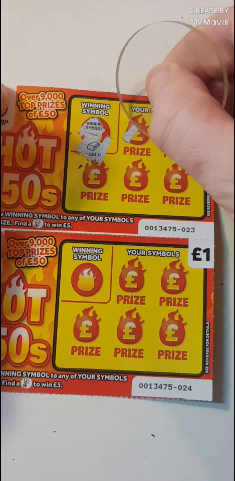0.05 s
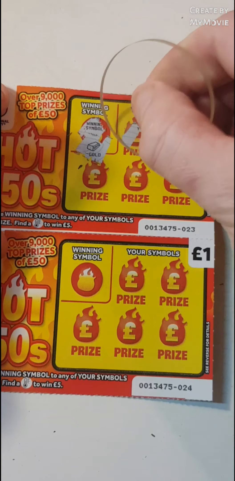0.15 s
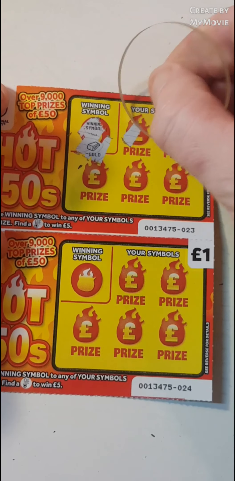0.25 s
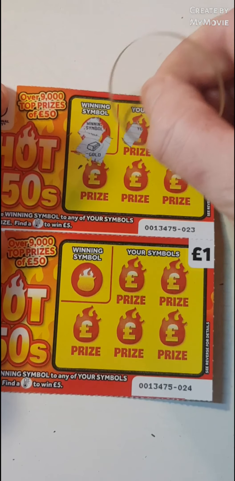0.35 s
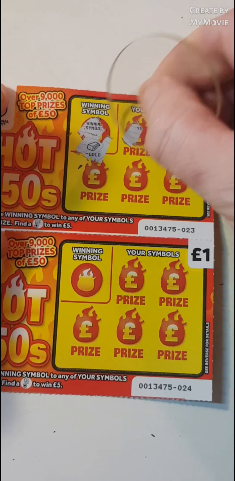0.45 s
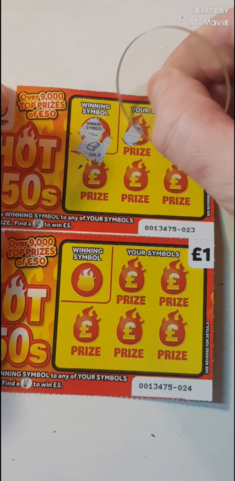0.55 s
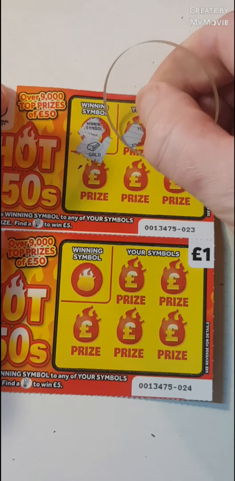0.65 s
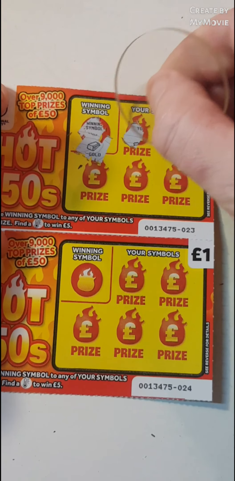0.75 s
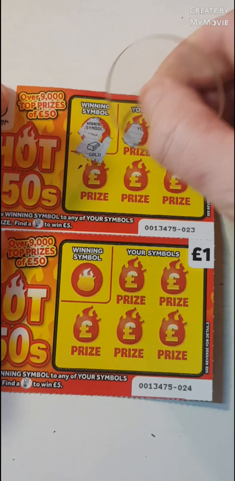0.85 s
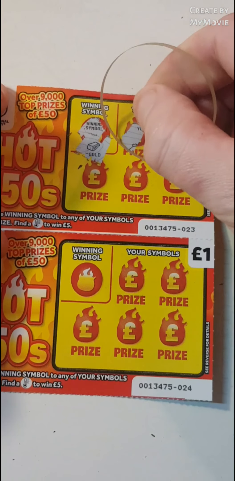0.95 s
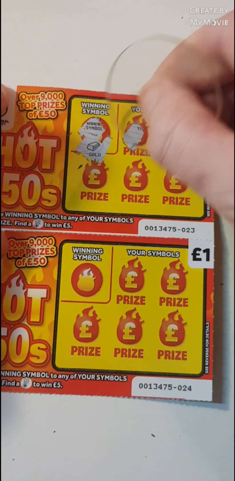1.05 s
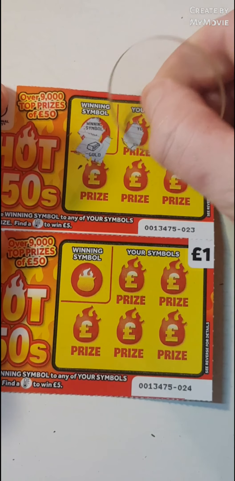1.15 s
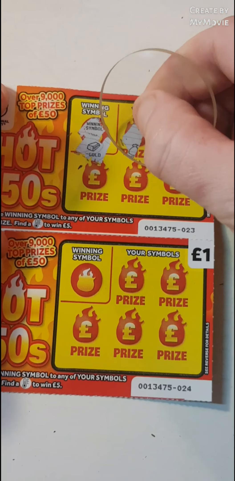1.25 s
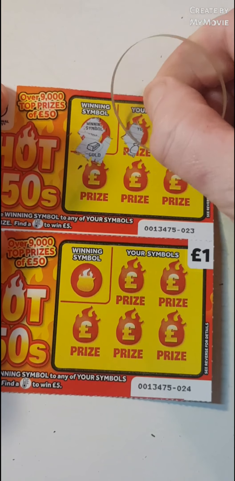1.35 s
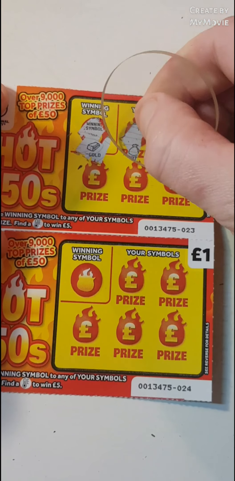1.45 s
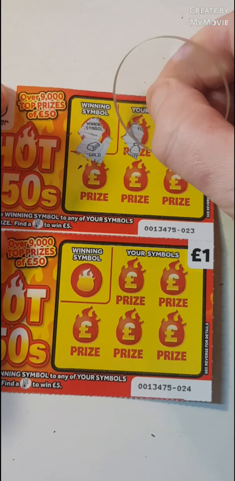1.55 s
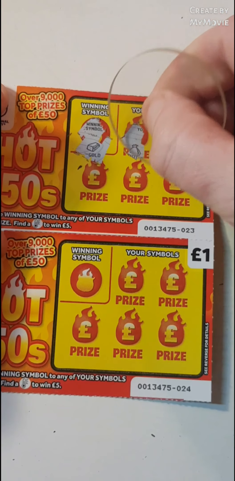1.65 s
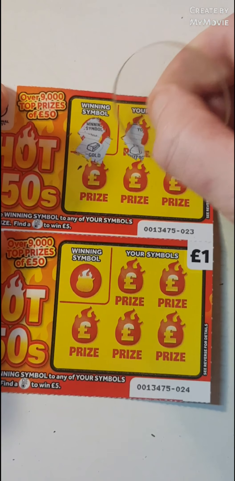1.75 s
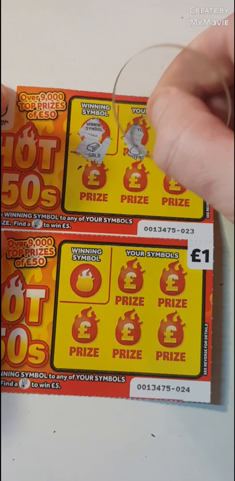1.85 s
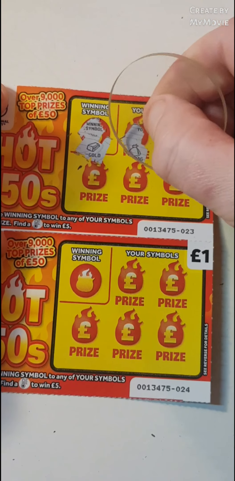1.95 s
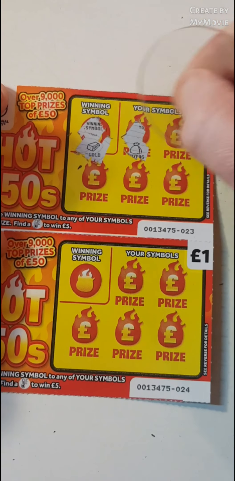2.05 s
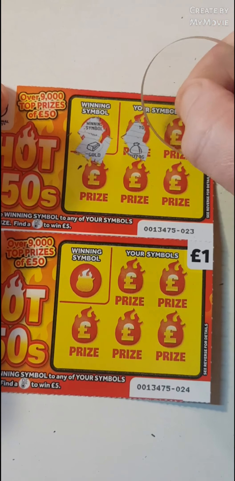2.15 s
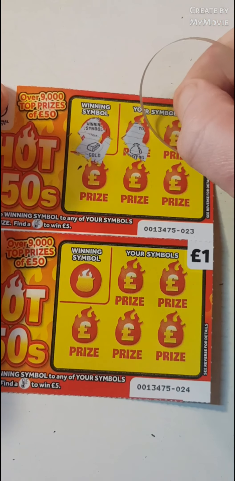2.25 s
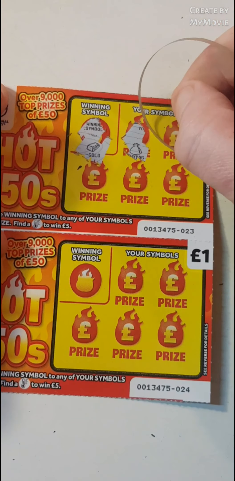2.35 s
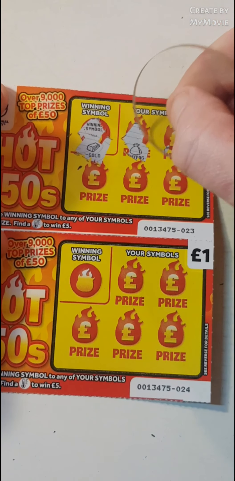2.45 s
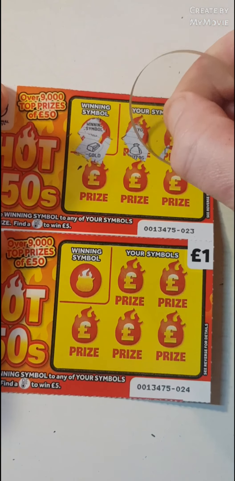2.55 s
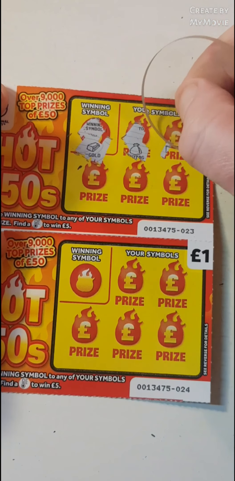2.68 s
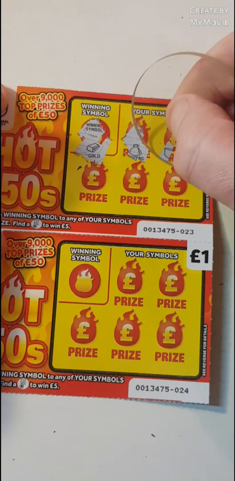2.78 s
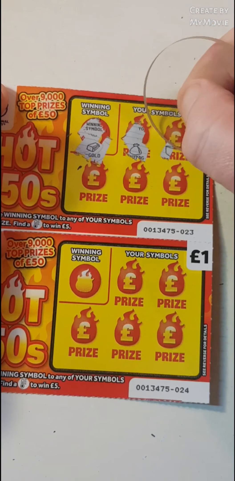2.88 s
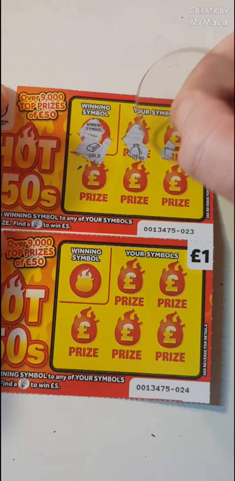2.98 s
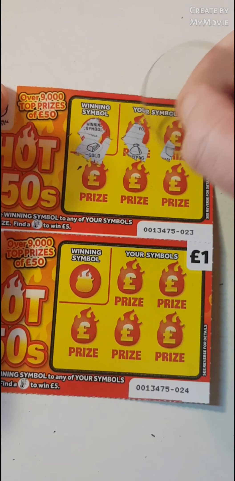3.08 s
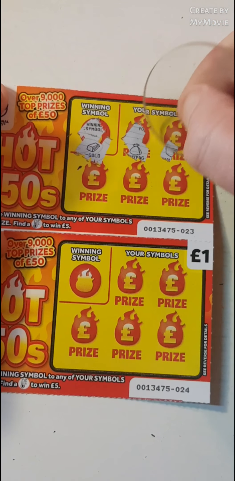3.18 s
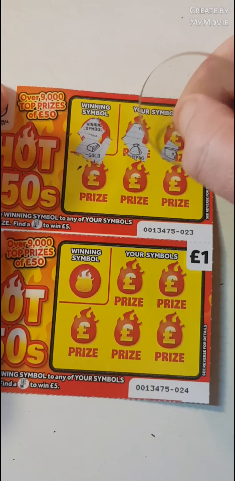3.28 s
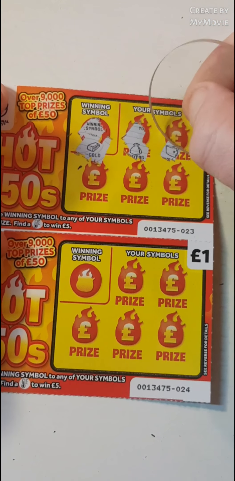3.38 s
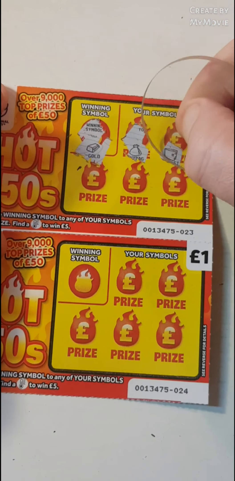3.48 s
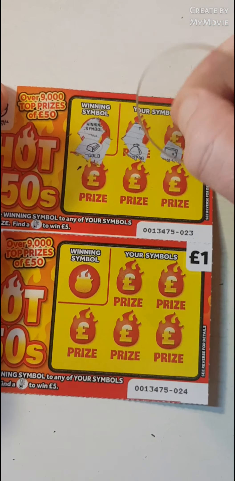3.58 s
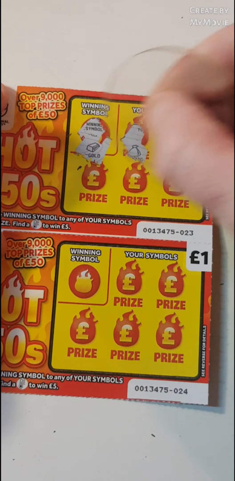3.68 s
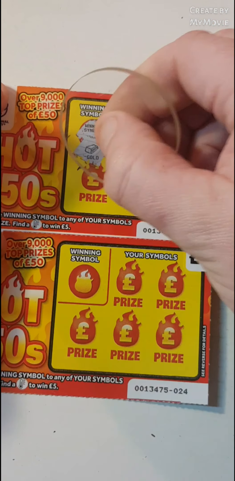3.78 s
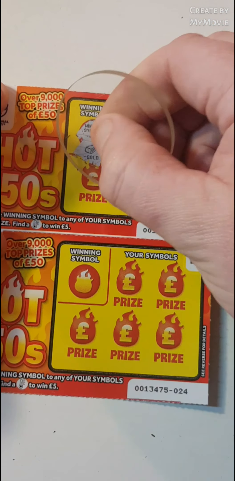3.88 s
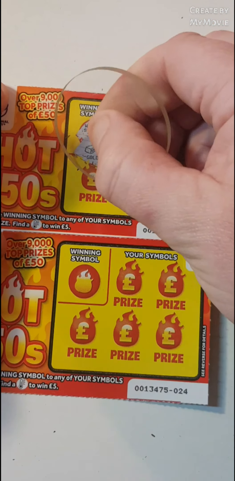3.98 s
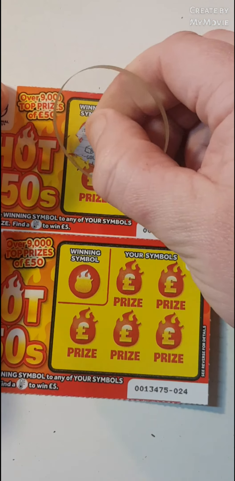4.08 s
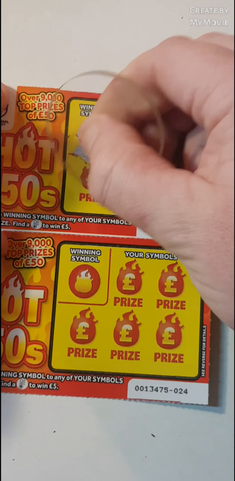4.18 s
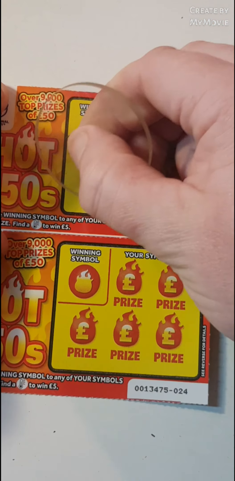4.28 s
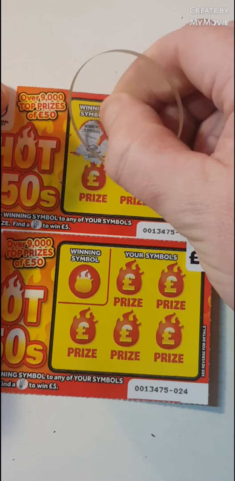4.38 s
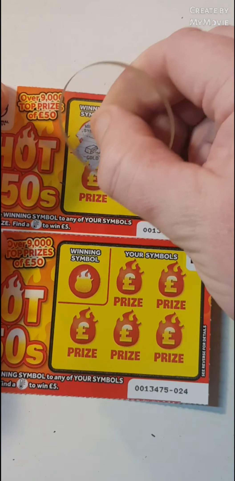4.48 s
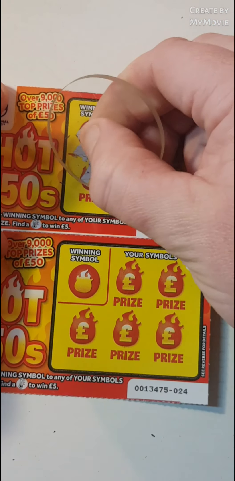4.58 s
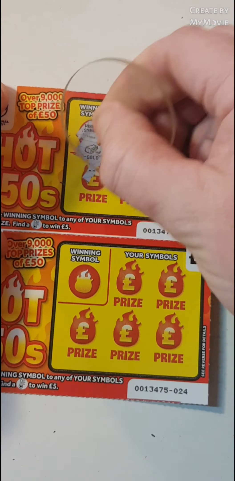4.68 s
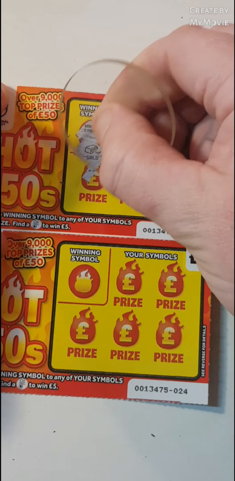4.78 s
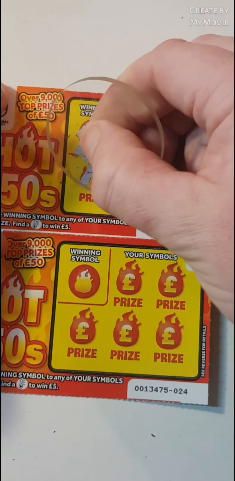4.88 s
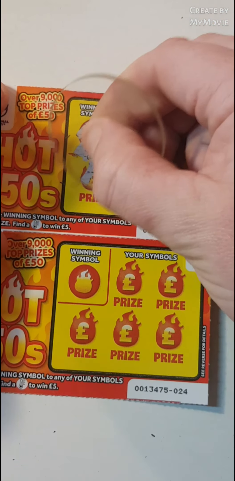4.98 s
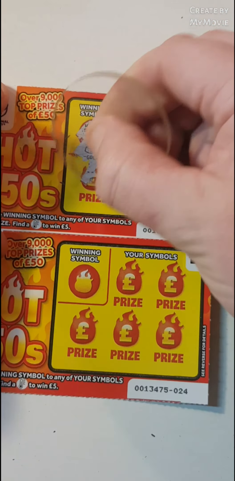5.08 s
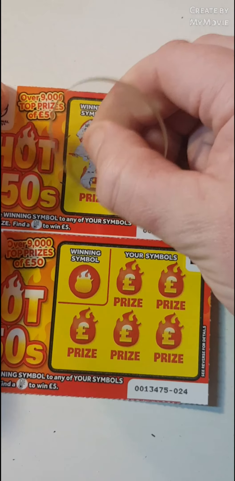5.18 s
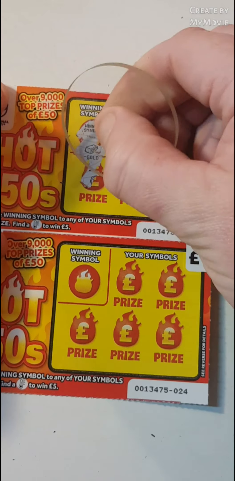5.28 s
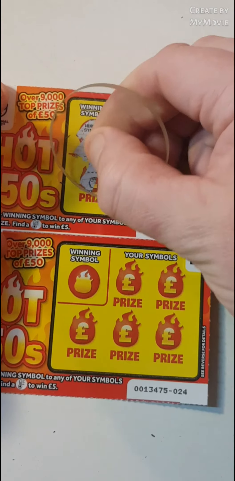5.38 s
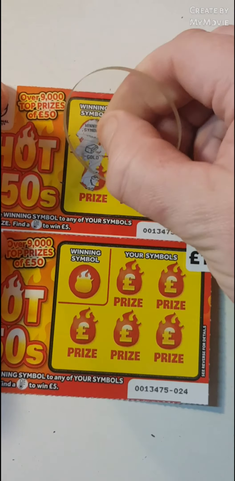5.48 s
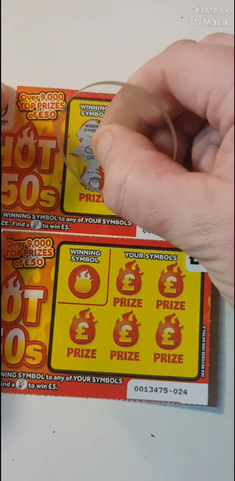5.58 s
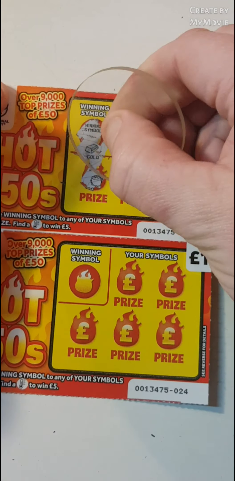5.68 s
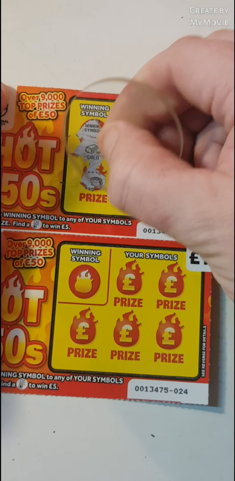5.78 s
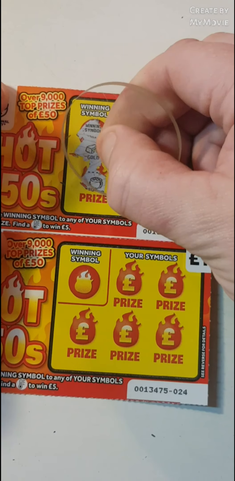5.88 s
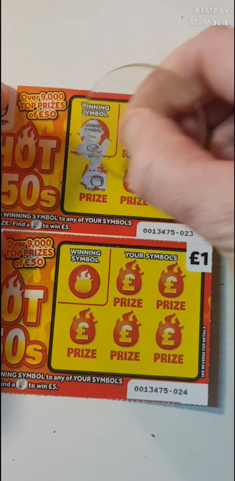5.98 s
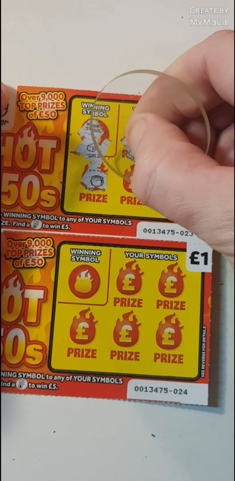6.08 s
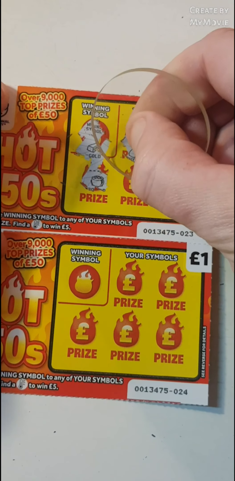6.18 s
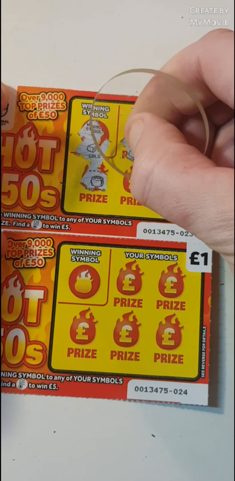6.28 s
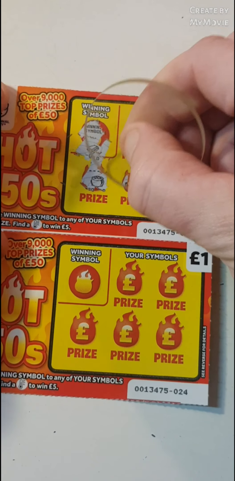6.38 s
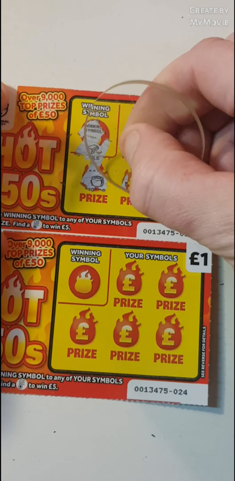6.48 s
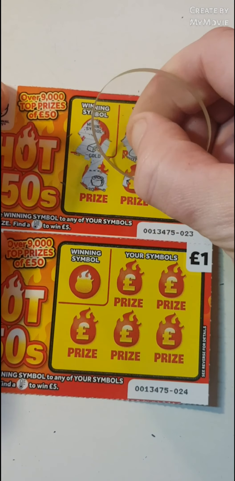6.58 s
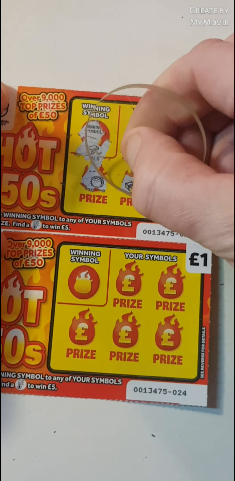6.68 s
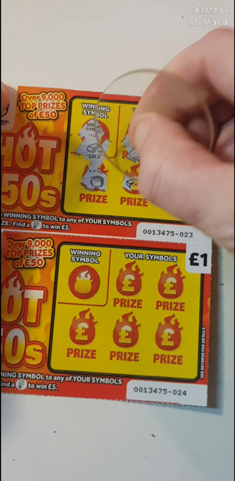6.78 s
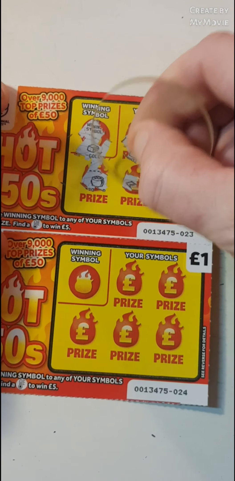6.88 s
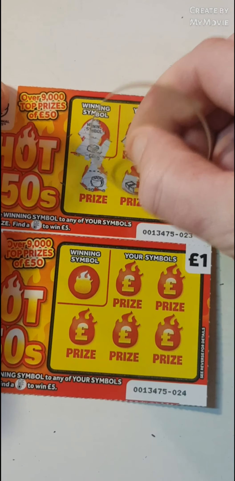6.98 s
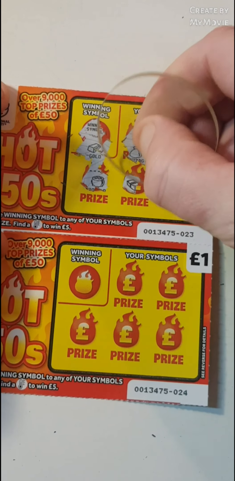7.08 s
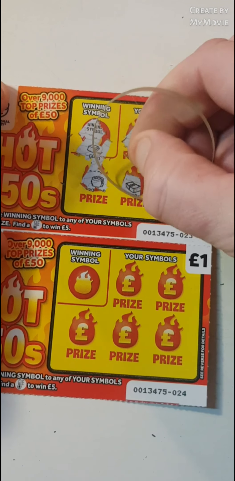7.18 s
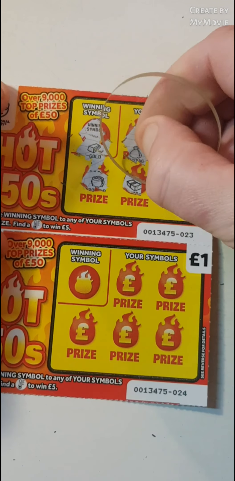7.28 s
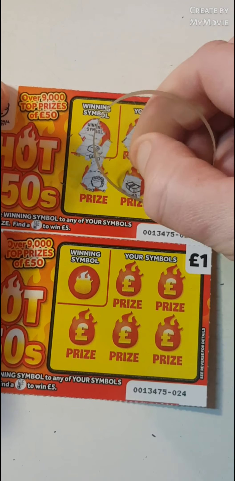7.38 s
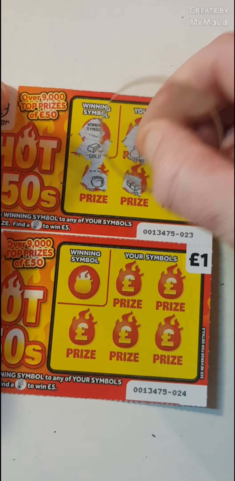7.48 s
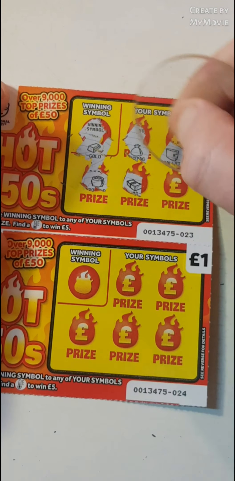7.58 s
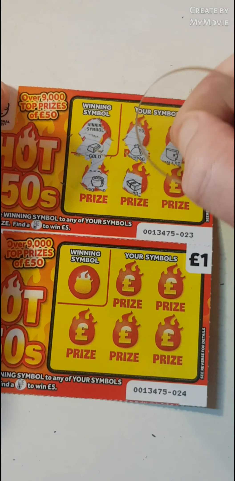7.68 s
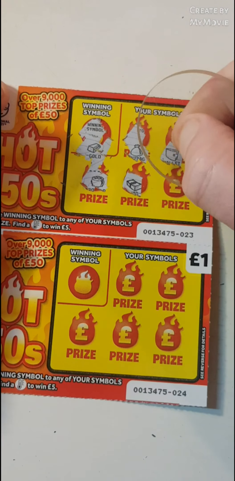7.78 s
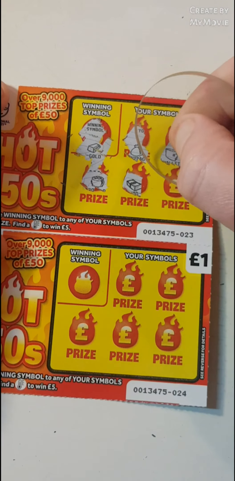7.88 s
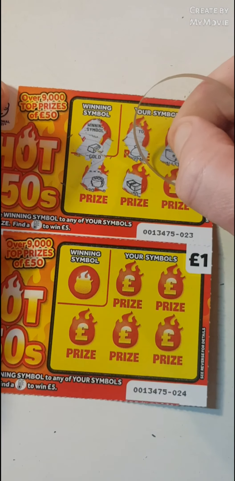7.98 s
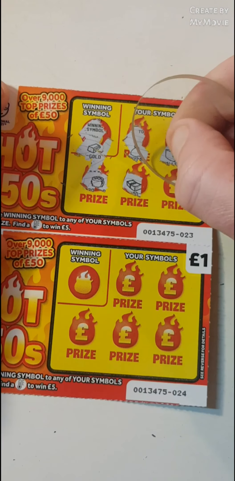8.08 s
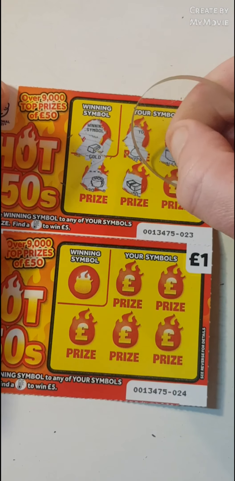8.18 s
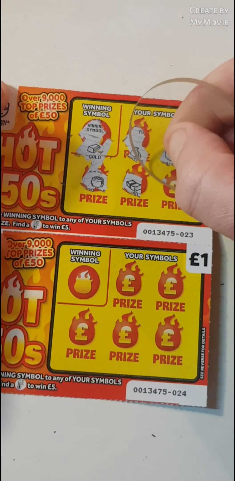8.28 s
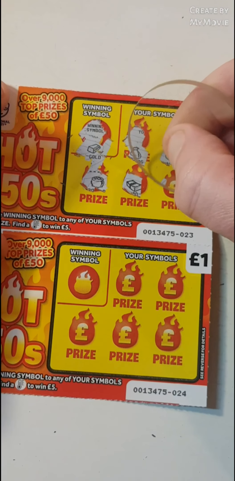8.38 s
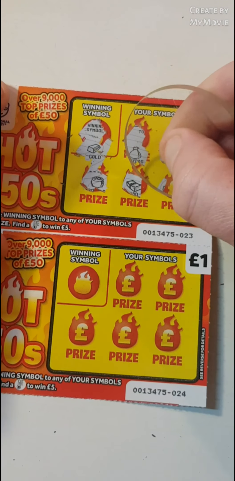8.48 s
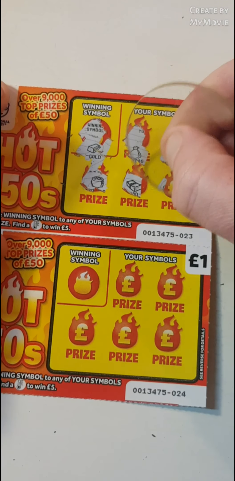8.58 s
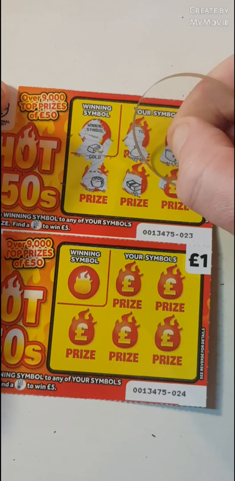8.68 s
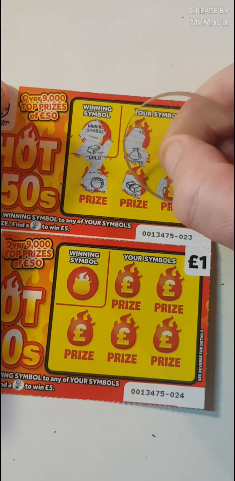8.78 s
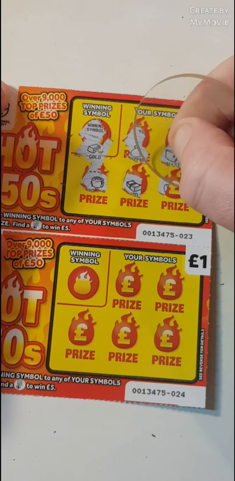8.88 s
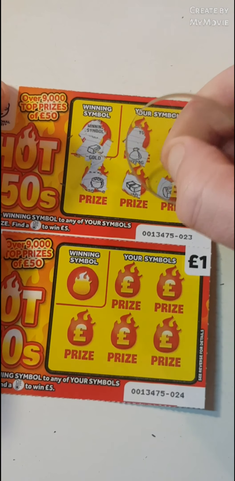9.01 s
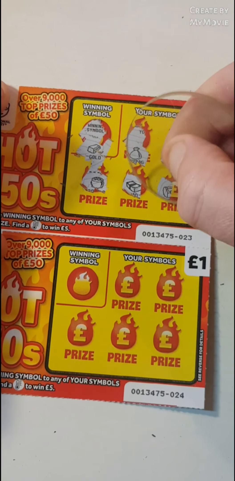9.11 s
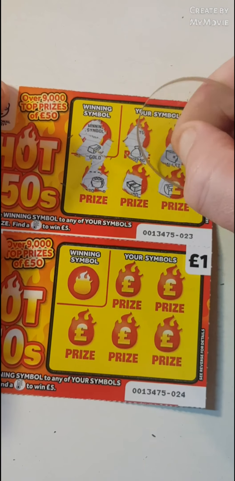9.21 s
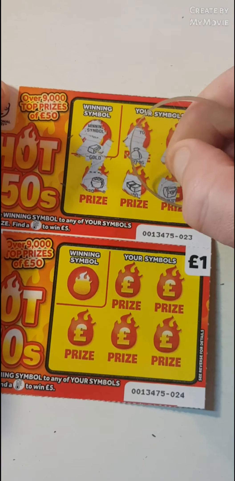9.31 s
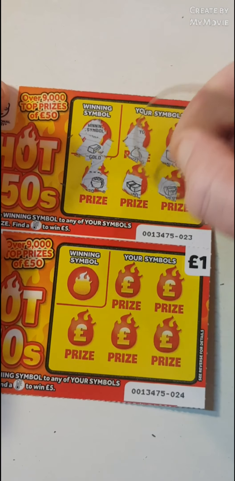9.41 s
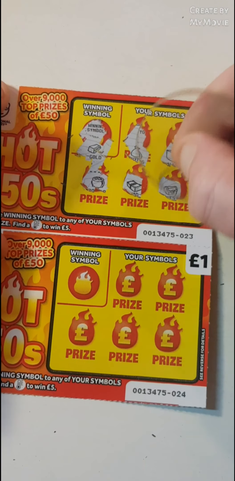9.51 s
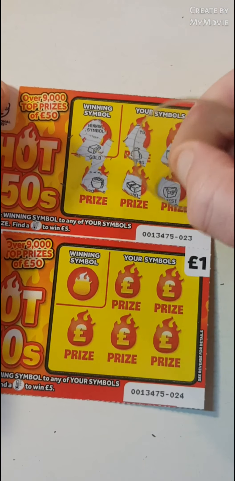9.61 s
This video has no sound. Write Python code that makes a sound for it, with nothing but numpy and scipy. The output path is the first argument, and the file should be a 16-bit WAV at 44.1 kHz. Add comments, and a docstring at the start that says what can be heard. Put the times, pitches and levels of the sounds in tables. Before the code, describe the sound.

Runs of quick, gritty scratching on a paper card, with light bumps on a hollow table in a quiet room.

```python
"""Quick, dry rasps: a plastic disc scrapes back and forth over the coating of a paper card.
Grit under its edge rings the disc and shakes the hollow table top below, and the coating hisses as
it tears off. The edge knocks down where the hand turns, and the strokes come in runs with short pauses.
Behind it all are a small quiet room, a faint low tremor of the table and microphone hiss."""
import sys
import numpy as np
from scipy import signal
from scipy.fft import rfft, irfft
from scipy.io import wavfile
from scipy.ndimage import uniform_filter1d

SR = 44100
rng = np.random.default_rng(int(sys.argv[2]) if len(sys.argv) > 2 else 0)


def to_wav(s):
    """Save 16-bit WAV."""
    ch = np.atleast_2d(s).T  # columns
    pcm = np.round(np.clip(ch, -1, 1) * 32767)  # PCM
    wavfile.write(sys.argv[1], SR, pcm.astype(np.int16))


N = 425565

# strokes of the disc: start t/s, length t/s, table level/dB, rasp level/dB
STROKES = [(0.013, 0.03, -51, -56.5), (.099, 0.065, -44.5, -48), (0.242, 0.03, -52, -56),
           (0.327, 0.065, -45.5, -52.5), (0.485, 0.024, -53.5, -56.5), (0.577, 0.056, -46, -53),
           (0.715, 0.054, -70, -91), (0.848, 0.078, -54.5, -71), (1.05, 0.032, -75, -80),
           (1.079, 0.02, -64.5, -72), (1.159, 0.058, -42.5, -49.5), (1.275, 0.063, -60, -72.5),
           (1.397, .058, -44.5, -54), (1.523, 0.03, -51, -53), (1.623, 0.056, -43.5, -50.5),
           (1.757, 0.023, -51.5, -54), (1.862, 0.047, -45, -54), (2.423, 0.096, -49.5, -63.5),
           (2.596, 0.042, -49.5, -48.5), (2.714, .06, -43, -48), (2.862, 0.021, -54.5, -56),
           (2.96, 0.057, -45.5, -52), (3.088, 0.032, -51.5, -51), (3.189, 0.053, -45, -51.5),
           (3.314, 0.038, -49, -47.5), (3.42, 0.055, -43, -49), (3.61, 0.12, -87.5, -88),
           (4.184, 0.068, -51, -74), (4.323, .047, -53.5, -55.5), (4.437, 0.14, -43.5, -57.5),
           (4.676, 0.035, -58, -64.5), (4.788, 0.048, -49, -64), (4.974, 0.048, -60.5, -67),
           (5.077, 0.053, -42.5, -51), (5.22, 0.027, -46, -46.5), (5.316, .057, -42, -49.5),
           (5.445, 0.027, -46.5, -47), (5.543, 0.047, -43.5, -56), (5.66, 0.026, -45, -46.5),
           (5.772, 0.048, -41, -52), (5.91, 0.034, -59, -67), (6.349, 0.068, -46, -58),
           (6.517, 0.027, -45.5, -49.5), (6.633, 0.051, -45.5, -50.5), (6.75, 0.036, -64, -69),
           (6.79, .013, -60, -50), (6.872, 0.051, -44, -48), (7.018, .016, -48, -50),
           (7.1, 0.055, -43, -48), (7.205, 0.038, -61.5, -70), (7.241, 0.012, -52.5, -54),
           (7.313, 0.072, -56.5, -69.5), (8.262, 0.053, -54.5, -81), (8.398, 0.053, -53, -66),
           (8.602, .033, -52.5, -50.5), (8.729, 0.034, -44, -48.5), (8.845, 0.039, -51, -47.5),
           (8.965, 0.057, -44.5, -50), (9.129, .035, -61, -64.5), (9.163, 0.015, -51, -50),
           (9.242, 0.063, -44.5, -47.5), (9.375, .035, -68, -69), (9.408, 0.013, -58, -52),
           (9.497, 0.058, -45, -47)]
# the edge or hand meets the card: t/s, tick level/dB, thud level/dB, knock level/dB
KNOCKS = [(.262, -53, -40, -61), (0.452, -68, -42, -51), (.698, -73, -42, -53.5), (.885, -46.5, -34.5, -35),
          (1.042, -70, -42.5, -60), (1.293, -54.5, -47, -61), (1.499, -70, -45, -50),
          (1.728, -90, -43.5, -50), (1.966, -71.5, -43.5, -58), (2.207, -67, -77, -80),
          (2.222, -65, -35.5, -45), (2.403, -62.5, -55, -46.5), (2.826, -70, -42, -49.5),
          (2.879, -75, -40.5, -69), (3.553, -68, -45, -78), (3.621, -66, -53, -65), (3.922, -75, -62, -85),
          (4.351, -41, -41.5, -60), (4.391, -74, -42, -75), (4.445, -44.5, -35, -40.5),
          (4.649, -71, -41, -46.5), (4.759, -70, -39, -49), (4.818, -49.5, -32, -36),
          (4.955, -62, -43.5, -54.5), (5.192, -61, -42.5, -51.5), (5.423, -58, -40, -48.5),
          (5.644, -61, -45, -46), (5.897, -61, -41.5, -45.5), (5.998, -71, -38.5, -69),
          (6.154, -78, -40, -67), (6.356, -70, -46, -42.5), (6.751, -72, -42, -55),
          (6.792, -66, -40, -41.5), (6.984, -68, -43, -53), (7.007, -57, -63, -64), (7.2, -80, -43.5, -54),
          (7.368, -51.5, -47, -41.5), (7.445, -71, -42, -58), (7.909, -66.5, -61, -83),
          (8.394, -68, -38.5, -47), (8.713, -78, -45, -49), (8.755, -58, -41, -41),
          (8.835, -69.5, -47, -48.5), (8.884, -68, -44, -50), (9.127, -62, -47.5, -51.5),
          (9.409, -66, -42, -55)]
# low modes of the table top (a mode is a note it rings at): f/Hz, width f/Hz, level/dB
TABLE_LOW_MODES = [(36.5, 23.7, -7.5), (65.9, 13.2, 1), (105, 9.3, 3), (168.7, 19, -2.5)]
# upper modes of the table top: f/Hz, width f/Hz, level/dB
TABLE_HIGH_MODES = [(269.1, 10.6, 5), (347, 62, -5.5), (472.6, 18, 0.5), (524, 20.4, 2), (623, 43, -3),
                    (750, 48.7, -3.5), (829.7, 26.3, -2), (1133, 176, -3), (1209, 96, -0.5),
                    (1419, 48, -10.5), (1890, 160, -21), (2080, 29, -21.5)]
# modes of the disc held in the fingers: f/Hz, width f/Hz, level/dB
DISC_MODES = [(2455, 173, 4), (2724, 73, 2.5), (2998, 190, -1), (3426, 160, 1.5), (3656, 220, 1),
              (4170, 350, -2), (4770, 890, -7)]
# tone colour of the coating tearing off: f/Hz, relative level/dB
TEAR_SPECTRUM = [(2940, -69), (5000, 4.5), (6050, 5), (7380, 0), (9550, -7), (10200, -2.5), (13200, 1),
                 (14700, -6.5), (16000, -5)]
# tone colour of the room and microphone noise: f/Hz, relative level/dB
FLOOR_SPECTRUM = [(120, -30), (200, -18), (340, 6), (558, -4), (1940, -9), (2090, -11), (4600, -10.5),
                  (8120, -23), (10500, -5.5), (12500, -0.5), (16000, 1)]
# the weight of the arm rocking the table: t/s, level/dB
ARM_SWAY = [(0, -54.5), (3.4, -56), (3.7, -60.5), (4.2, -60.5), (6, -59.5), (7.4, -52.5), (7.6, -63.5),
            (8.3, -66), (8.7, -50)]
# centre of the rasp, set by how the disc leans: t/s, on a drag f/Hz, on a return flick f/Hz
RASP_CENTRES = [(0, 3050, 3770), (3.5, 3160, 3860), (4.5, 3030, 3820), (5.8, 3400, 3870), (7.1, 3760, 4180),
                (8.3, 3480, 3900), (9.6, 4000, 4330)]

FLOOR_DB, TREMOR_DB = -70, -73.5
ROOM_FADE_S, ROOM_DB = 0.17, -14.5   # the echo takes this long to fall by 60 dB
GRIT_PER_S, GRIT_SPREAD_DB, CATCH_DB = 5000, 0.4, 2.63
FLICK_S = 0.0475   # shorter strokes are return flicks, longer ones are drags
DRAG_BITE, FLICK_BITE = 0.68, 0.64   # moment of hardest bite, as a share of the stroke
RASP_WIDTH_HZ, GRIP_DB, HAND_ECHO_S = 850, 1.5, 0.00049
TEAR_DB, TEAR_LOSS_DB_PER_S = -1.85, 45.5   # hiss against the rasp; long strokes tear more softly
SHAKE_DB = 1.5   # deep shake of the table against the push on it
REST_DB, REST_RASP_DB, REST_S = -24.5, -10.5, 0.23   # light rubbing between strokes


def amp(db):
    """Turn decibels into a factor to multiply by."""
    return 10 ** (np.asarray(db) / 20)


def rms_one(x):
    """Scale a signal so its average strength (rms) is 1."""
    return x / np.sqrt(np.mean(x ** 2) + 1e-20)


def cut(x, order, hz, kind):
    """Keep the "low", "high" or "band" part of a sound; a higher order cuts more sharply."""
    return signal.sosfilt(signal.butter(order, hz, kind, fs=SR, output="sos"), x)


def soften(x, hz):
    """Take away the treble, as a soft contact does to a blow."""
    return cut(x + 1e-18, 2, hz, "low")


def drift(rate_hz):
    """A smooth random wobble of about size 1."""
    r = np.exp(-2 * np.pi * rate_hz / SR)
    return rms_one(signal.lfilter([1], [1, -2 * r, r * r], rng.standard_normal(N + SR))[SR:])


def coloured(x, spectrum):
    """Give noise a tone colour, at strength 1."""
    hz, db = np.transpose(spectrum)
    gain = amp(np.interp(np.log(np.fft.rfftfreq(N, 1 / SR) + 1), np.log(hz), db))
    return rms_one(irfft(rfft(x) * gain, N))


def swell(phase, top, rise, fall, flatness, onset=0):
    """A hump of loudness around top, pointed or flat; onset steepens its rise."""
    early = phase < top
    distance = np.abs((phase - top) / np.where(early, rise, fall))
    return np.exp(-distance ** (flatness + onset * early))


def resonate(x, hz, width_hz):
    """Ring one mode; the narrower it is, the longer it rings."""
    r = np.exp(-np.pi * width_hz / SR)
    feedback = [1, -2 * r * np.cos(2 * np.pi * hz / SR), r * r]
    return signal.lfilter(np.array([1, 0, -1]) * (1 - r * r) / 2, feedback, x + 1e-18)


def body(x, modes, wander_db=0):
    """Ring all modes of an object; with wander_db, a moving contact feeds them unevenly."""
    pulse = np.eye(1, SR // 8)[0]
    ringing = pulse_ring = 0
    for k, (hz, width, db) in enumerate(modes):
        gain = (-1) ** k * amp(db)
        feed = amp(wander_db * drift(1.41)) if wander_db else 1
        ringing += gain * resonate(x * feed, hz, width)
        pulse_ring += gain * resonate(pulse, hz, width)
    return ringing / np.sqrt(np.sum(pulse_ring ** 2))   # white noise keeps its strength


def background():
    """Steady hiss, a wavering tremor of the table and its low rocking under the arm."""
    wavering = rng.standard_normal(N) * amp(6 * np.tanh(drift(7.2)))
    tremor = soften(body(wavering, TABLE_LOW_MODES + TABLE_HIGH_MODES[1:2]), hz=500)
    sway_db = np.interp(np.arange(N) / SR, *np.transpose(ARM_SWAY))
    sway = amp(sway_db) * body(rng.standard_normal(N), TABLE_LOW_MODES[:2])
    hiss = coloured(rng.standard_normal(N), FLOOR_SPECTRUM)
    return amp(FLOOR_DB) * hiss + amp(TREMOR_DB) * tremor + sway


def room(x):
    """Many small echoes die away, duller than the direct sound."""
    age = np.arange(SR // 2) / SR
    tail = rng.standard_normal(len(age)) * amp(-60 * age / ROOM_FADE_S) * (age > .004)
    dull = signal.lfilter([.6], [1, -.4], tail)
    return signal.fftconvolve(x, dull / np.sqrt(np.sum(dull ** 2)))[:N]


def knocks():
    """Each landing thuds in the table's low modes, rattles its upper ones and ticks on disc and card."""
    thud, knock, tick = np.zeros((3, N))
    age = np.arange(1300) / SR
    for start, tick_db, thud_db, knock_db in KNOCKS:
        at = round(start * SR)
        span = slice(at, at + len(age))
        rattle = rng.standard_normal(len(age))
        thud[at] = amp(thud_db)
        knock[at:at + 4] += 3 * amp(knock_db)   # the first contact is the hardest
        knock[span] += amp(knock_db) * rattle * np.exp(-age / .011)
        tick[span] += amp(tick_db) * rattle * np.exp(-age / .0025)
    soft_push = soften(np.eye(1, SR // 4)[0], hz=376)
    bump = body(cut(soft_push, 2, 70, "high"), TABLE_LOW_MODES)   # too brief for the deepest modes
    thuds = signal.fftconvolve(thud, bump / np.abs(bump).max())[:N]
    rattles = body(soften(knock, hz=944), TABLE_HIGH_MODES)
    ticks = body(tick, DISC_MODES) + cut(tick, 1, [4500, 9000], "band")
    return thuds + rattles + ticks


def grit():
    """Tiny slips of uneven size; the edge catches and lets go, so they come in clumps."""
    slips = (rng.random(N) < GRIT_PER_S / SR) * rng.choice([-1, 1], N)
    sizes = amp(GRIT_SPREAD_DB * np.minimum(rng.exponential(1, N), 4) + CATCH_DB * drift(53))
    return rms_one(slips * sizes)


def hand_echo(hiss, bend):
    """The hand close by reflects the hiss and colours it; the delay changes with the grip."""
    delay = round(SR * HAND_ECHO_S * amp(.4 * bend))
    return hiss + 0.32 * np.roll(hiss, delay)


def disc_rasp(slips, centre_hz, grip, bend):
    """The lean of the disc picks which modes ring; the fingers shift their pitch and level."""
    leaning = resonate(slips, centre_hz, RASP_WIDTH_HZ) + 0.024 * slips
    held = [(hz * (1 + bend / 60), width, db + GRIP_DB * finger)
            for (hz, width, db), finger in zip(DISC_MODES, grip)]
    return body(leaning, held) / np.sqrt(RASP_WIDTH_HZ / 3000)


def scraping():
    """Each stroke swells and fades with the hand's speed; table, disc and coating share the same grit."""
    slips, t = grit(), np.arange(N) / SR
    lean_s, drag_hz, flick_hz = np.transpose(RASP_CENTRES)
    flakes = coloured(slips, TEAR_SPECTRUM)
    push, rasp, hiss = np.zeros((3, N))
    for start, length, table_db, rasp_db in STROKES:
        *grip, bend = rng.standard_normal(len(DISC_MODES) + 1)   # a new hold for each stroke
        bite, lean_hz = (FLICK_BITE, flick_hz) if length < FLICK_S else (DRAG_BITE, drag_hz)
        centre_hz = np.interp(start, lean_s, lean_hz)
        span = slice(max(round((start - length) * SR), 0), round((start + 2 * length + .02) * SR))
        phase = (t[span] - start) / length
        flatness = 1.64 + 18 * length   # short flicks catch once, long drags hold their level
        # the table feels even a slow edge, so its hump is wider
        push[span] += amp(table_db) * swell(phase, top=.48, rise=.55, fall=.67, flatness=flatness)
        cutting = swell(phase, top=bite, rise=.56, fall=.35, flatness=flatness, onset=.5)
        rasp[span] += amp(rasp_db) * disc_rasp(slips[span] * cutting, centre_hz, grip, bend)
        tear_db = rasp_db + TEAR_DB - TEAR_LOSS_DB_PER_S * length
        hiss[span] += amp(tear_db) * cutting ** 0.85 * hand_echo(flakes[span], bend)
    jolts = rng.standard_normal(N) * np.sqrt(push * push.mean())
    shake = amp(SHAKE_DB) * body(jolts, TABLE_LOW_MODES)
    rubbing = amp(REST_DB) * uniform_filter1d(push, round(REST_S * SR))
    rasp += amp(REST_RASP_DB) * body(slips * rubbing, DISC_MODES)
    table = body(slips * (push + rubbing), TABLE_HIGH_MODES, wander_db=1.8)
    return table + rasp + hiss + shake


def scene():
    """Scraping and knocks with their room echo, over the background, in one channel."""
    near = scraping() + knocks()
    return (near + amp(ROOM_DB) * room(near) + background())[None]


def record(dry):
    """The microphone loses the deepest bass, and the highest treble is cut off."""
    treble_cut = signal.ellip(12, .5, 60, 15790, fs=SR, output="sos")
    return signal.sosfilt(treble_cut, cut(dry, 2, 30, "high"))


dry = scene()
out = record(dry)
to_wav(out)
```